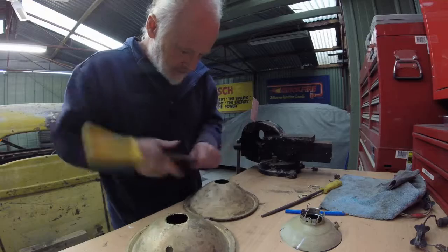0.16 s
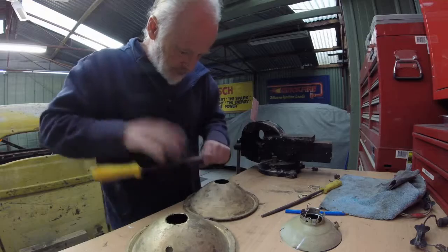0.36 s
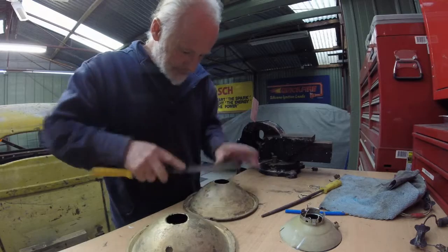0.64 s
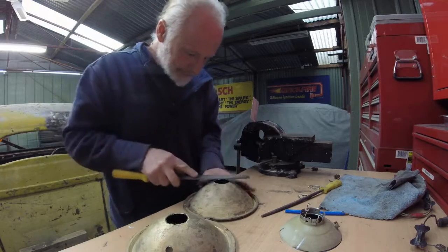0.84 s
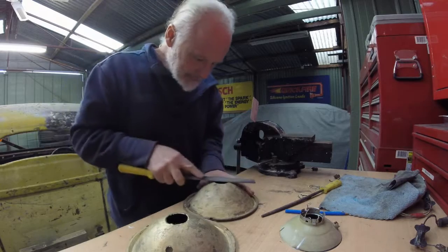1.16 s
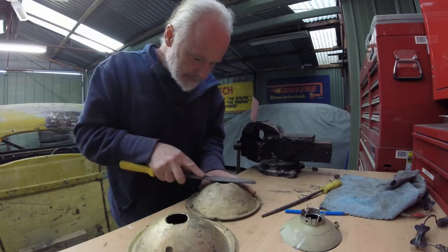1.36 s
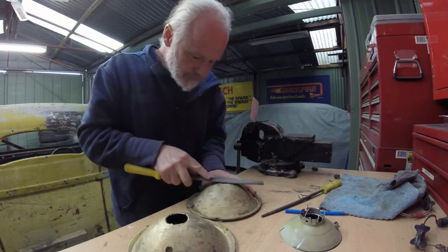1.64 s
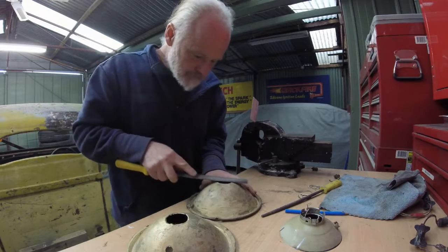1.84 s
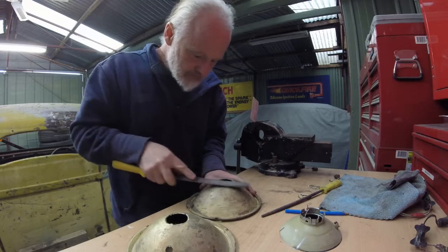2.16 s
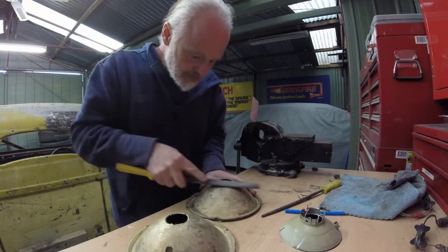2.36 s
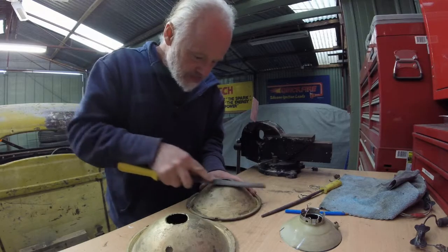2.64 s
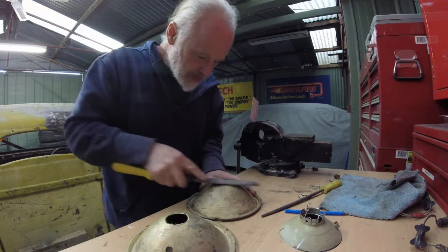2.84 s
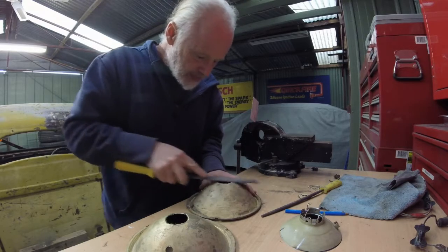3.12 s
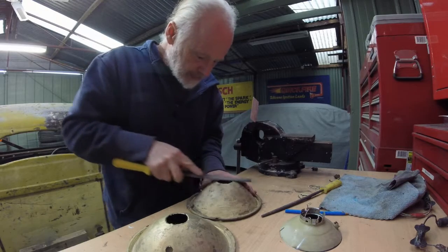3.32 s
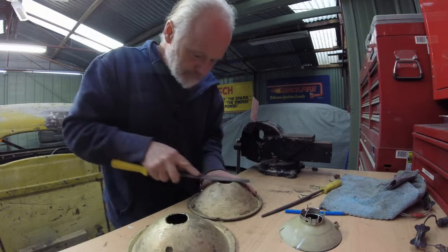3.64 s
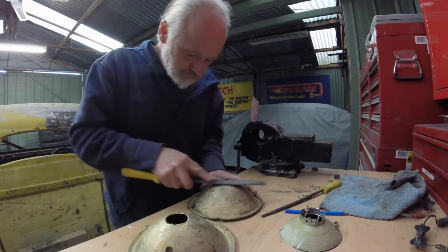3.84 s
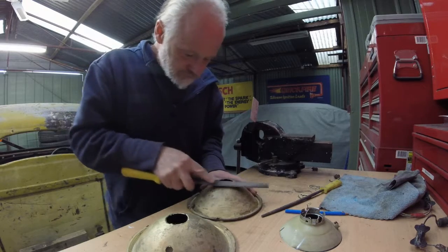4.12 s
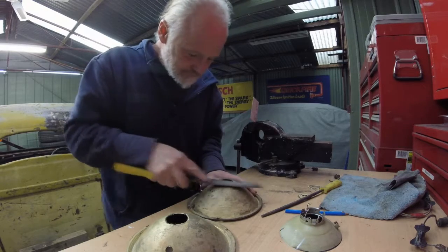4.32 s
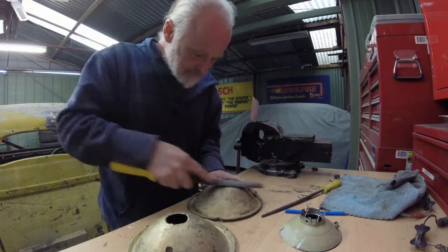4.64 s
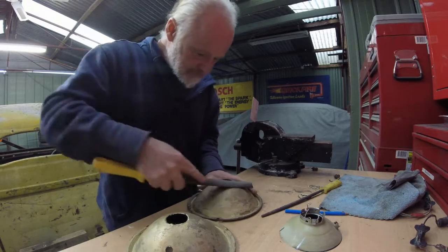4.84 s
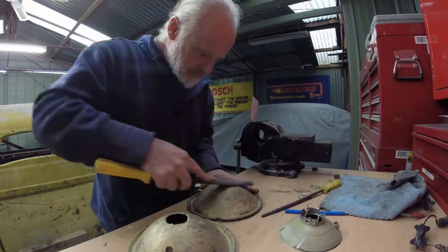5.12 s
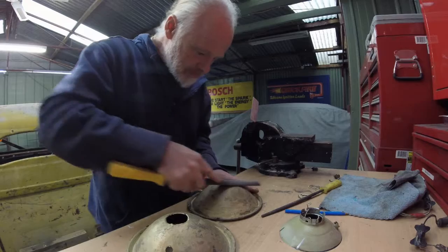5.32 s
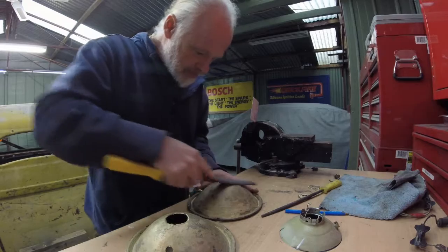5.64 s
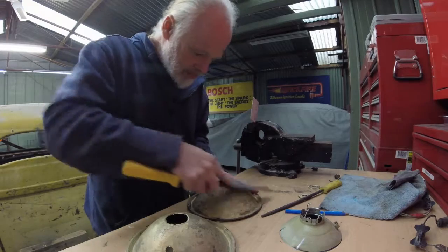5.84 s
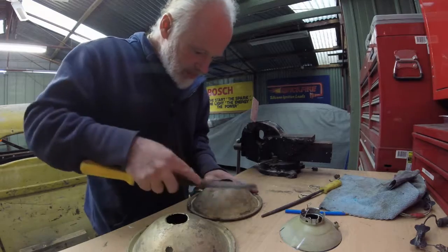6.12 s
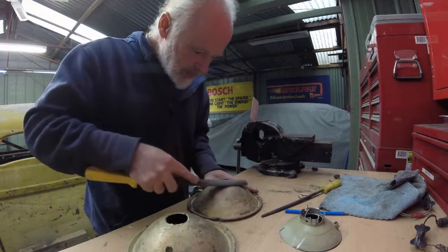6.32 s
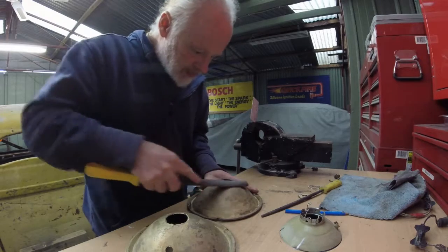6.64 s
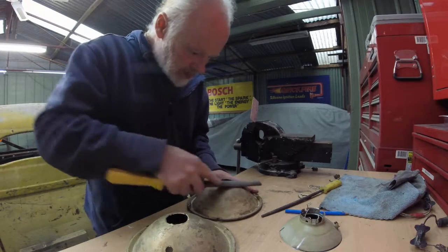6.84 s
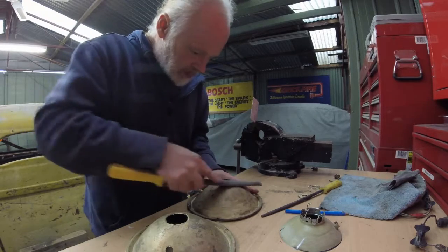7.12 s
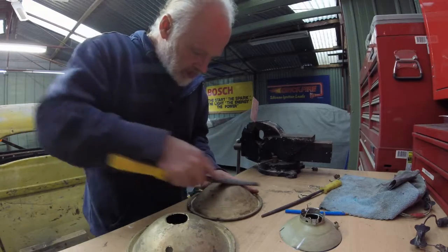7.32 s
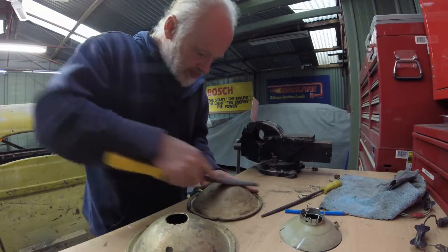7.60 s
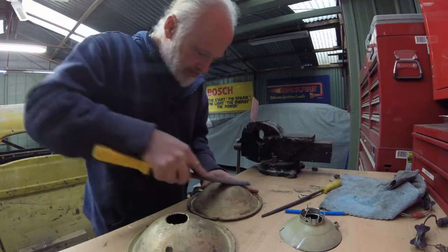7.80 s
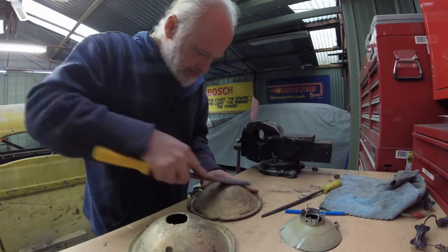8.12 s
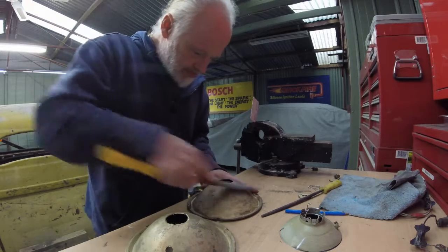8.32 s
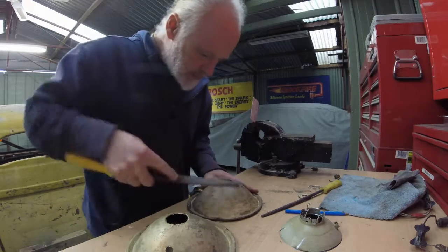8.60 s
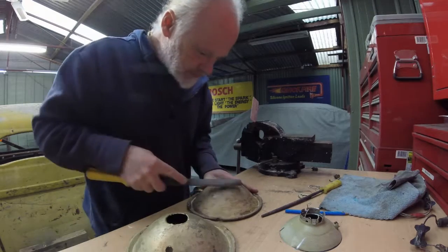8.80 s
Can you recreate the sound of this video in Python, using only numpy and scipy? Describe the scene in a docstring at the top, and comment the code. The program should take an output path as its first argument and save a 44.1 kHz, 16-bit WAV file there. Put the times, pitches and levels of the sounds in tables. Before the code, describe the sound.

A hand file rasps quickly back and forth on a thin metal bowl, with occasional knocks, in a small garage.

```python
"""A hand file works the edge of a thin metal bowl, about seven passes a second, in two runs with a rest.
Its teeth strike a dense train of impulses that excites the bowl's resonances. Stick-slip friction makes
the blade judder and briefly squeal; now and then it catches and rattles the rim on the wooden bench
the bowl is held down on. A small, hard garage reverberates around it, over a low rumble."""
import sys
import numpy as np
from scipy import signal
from scipy.fft import rfft, irfft
from scipy.io import wavfile
from scipy.ndimage import map_coordinates

SR = 44100
rng = np.random.default_rng(int(sys.argv[2]) if len(sys.argv) > 2 else 0)


def inscribe(sig):
    """Save sig as 16-bit PCM at rate SR to the path in sys.argv[1].

    A 1-D sig is mono; a 2-D sig holds one channel per row.
    Samples are clipped to [-1, 1] before scaling.
    """
    pcm = np.round(np.clip(np.atleast_2d(sig).T, -1, 1) * 32767)
    wavfile.write(sys.argv[1], SR, pcm.astype(np.int16))


N = 395136
SECOND_SPOT_S = 4.75  # the file moves to another spot on the edge

# Force spectra of the cutting teeth (rasp, hiss) and the slipping blade (judder).
# Each row: frequency in Hz, relative level in dB.
RASP_SPECTRUM = [(100, -18), (300, 4), (600, -3), (1000, 2.5), (1700, -4), (2200, 0), (2700, -9.5),
                 (3300, -16.5), (3900, -19.5), (6000, -29.5), (16000, -97)]
HISS_SPECTRUM = [(1000, -74.5), (3000, -1.5), (3800, -8.5), (4500, 5), (5500, -2.5), (7000, -1),
                 (8500, -6.5), (10000, -9.5), (12300, -17), (15000, -31)]
JUDDER_SPECTRUM = [(40, -29.5), (85, -9.5), (130, -2), (200, -2.5), (280, 0), (450, -2), (620, -5),
                   (780, -11.5), (1300, -16.5), (2500, -35), (6000, -56)]
def filing(tooth_rate=4200, slip_rate=900, grab_db=2, overlap_s=.005):
    """Impulse excitation: teeth strike faster and harder with speed; slips under load shake the bowl."""
    body, edge = np.zeros((2, N))
    for k, (s, length) in enumerate(passes()):
        direction = (-1) ** k  # 1 is a push, -1 a pull
        rasp_db, hiss_db, judder_db = effort(s + length / 2, direction)
        n = int((length + 2 * overlap_s) * SR)  # the file stays in contact as it turns round
        speed, load = swing(n, crest=.53 - .02 * direction), swing(n, crest=.54)
        stretch = 1 + .012 * rng.standard_normal()  # each pass presses the bowl differently
        ring = 1 + .2 * rng.standard_normal(len(BOWL_MODES))  # each contact point favours other modes
        teeth = ticks(n, tooth_rate * (speed + .3), scatter_db=3) * undb(grab_db * wobble(n, rate=170))
        slips = ticks(n, slip_rate, scatter_db=.7)
        rasp = signal.fftconvolve(teeth * speed ** 1.65, bowl(RASP_SPECTRUM, s, stretch, ring=ring))
        rasp = glide(rasp, n, .025 * direction)  # contact runs up the blade on a push, down on a pull
        judder = signal.fftconvolve(slips * load ** .89, bowl(JUDDER_SPECTRUM, s, stretch))
        add(body, s - overlap_s, undb(rasp_db) * rasp + undb(judder_db + .5) * judder)
        tilt_db = .82 * (hiss_db + 5.5)  # light, hissy passes reach further into the treble
        hiss = signal.fftconvolve(teeth * speed ** 1.79, bowl(HISS_SPECTRUM, s, stretch, tilt_db, ring))
        add(edge, s - overlap_s, undb(rasp_db + hiss_db - 1.5) * glide(hiss, n, .007 * direction))
    return body + steel(edge)


# Bouts of even strokes. Each row: start in seconds, end in seconds, number of passes.
STROKE_BOUTS = [(1.25, 1.513, 1), (1.527, 2.08, 3), (2.08, 2.41, 2), (2.412, 3.582, 8), (3.582, 4.938, 9),
                (4.938, 5.939, 7), (5.939, 6.105, 1), (6.56, 6.757, 1), (6.748, 7.045, 2),
                (7.045, 8.612, 11)]
def passes():
    """Periodic motion: each bout divides into equal passes, given as start and length."""
    return [(s, (end - start) / count) for start, end, count in STROKE_BOUTS
            for s in np.linspace(start, end, count, endpoint=False)]


# How hard the file is worked, heavy at first, then light and hissy.
# Each row: time in seconds, then relative levels in dB of rasp, of hiss over rasp and of judder.
HAND_EFFORT = [(1.41, -28.5, -16, -29), (1.7, -37, -8, -27.5), (1.98, -21, -10, -21.5),
               (2.16, -24, -9.5, -21.5), (2.36, -33, -7.5, -22.5), (2.65, -32, -7.5, -22.5),
               (3.22, -23, -9, -19), (3.97, -24, -8, -21.5), (4.6, -27.5, -9, -19.5),
               (4.95, -35.5, -6, -36), (5.3, -34, -7.5, -27), (5.72, -31, -4.5, -32.5),
               (6.0, -27, -5, -25.5), (6.67, -34.5, -3, -34), (7.2, -32, -6.5, -26),
               (7.6, -32.5, -2.5, -33), (8.27, -33, -4, -29), (8.54, -34, 1, -31)]
def effort(s, direction, push_rasp_db=-1.5, push_judder_db=2):
    """Directional friction: on the first spot a push shakes more and rasps less, a pull the reverse."""
    times, *columns = np.transpose(HAND_EFFORT)
    rasp_db, hiss_db, judder_db = (np.interp(s, times, column) for column in columns)
    lean = direction * (s < SECOND_SPOT_S)
    return rasp_db + lean * push_rasp_db, hiss_db, judder_db + lean * push_judder_db


def swing(n, crest, bite=.78):
    """Half-cycle envelope: zero at both ends, brisker at the start, peaking at the crest (0-1)."""
    turn = np.interp(np.arange(n) / n, [0, crest, 1], [0, .5, 1])
    return np.sin(np.pi * turn) ** np.where(turn < .5, bite, 1)


def ticks(n, rate, scatter_db):
    """Shot noise: random impacts of uneven size at a mean rate a second; rms 1."""
    chance, size, sign = rng.random(n), rng.standard_normal(n), rng.choice([-1, 1], n)
    return unit((chance < rate / SR) * sign * undb(scatter_db * np.clip(size, -2, 2)))


def glide(x, n, share):
    """Time warping: over n samples the pitch sweeps from a share below to a share above."""
    i = np.arange(len(x))
    progress = np.minimum(i / n, 1)
    return map_coordinates(x, [i + share * n * progress * (progress - 1)], order=3)


# Resonances of the bowl. Each row: frequency in Hz with the file on the first spot,
# frequency in Hz on the second spot, width in Hz, nominal lift in dB.
BOWL_MODES = [(155.5, 154.7, 28, 12), (353, 343.5, 72, 6), (538, 522, 97, 6), (690, 650, 31, 4),
              (847, 825, 45, 7), (968, 970, 124, 6), (1137, 1060, 21, 1.5), (1540, 1536, 156, 7.5),
              (1940, 1970, 133, 8.5), (2080, 2147, 156, 6), (2530, 1600, 92, 1.5), (2793, 2896, 143, 9),
              (3340, 3210, 210, 4.5), (4325, 4560, 250, 7.5), (5070, 5280, 370, 8), (5700, 5700, 120, 10),
              (6205, 6420, 350, 12), (6660, 5900, 110, 7), (7500, 11000, 130, -1.5), (7980, 8030, 690, 6.5)]
def bowl(spectrum, s, stretch=1, tilt_db=0, ring=1, size=4096):
    """Source and filter: the impulse response of a force spectrum shaped by the bowl's modes at time s."""
    hz = np.arange(size // 2 + 1) * SR / size
    octaves_up = np.log2(np.maximum(hz / 6000, 1))
    db = slope(spectrum, hz) + tilt_db * octaves_up
    for (first, second, width, lift), share in zip(BOWL_MODES, ring * np.ones(len(BOWL_MODES))):
        centre = stretch * (first if s < SECOND_SPOT_S else second)
        db = db + share * lift / (1 + (2 * (hz - centre) / width) ** 2)
    cepstrum = irfft(db * np.log(10) / 20)
    cepstrum[1:size // 2] *= 2  # folding gives a causal, minimum-phase response
    cepstrum[size // 2 + 1:] = 0
    return unit_energy(irfft(np.exp(rfft(cepstrum))))


def steel(hiss, direct_db=-1, overtone_db=-9, blade_db=-9):
    """Superposition: the hiss radiates straight from the edge and as the ring of the steel."""
    return (undb(direct_db) * hiss + undb(overtone_db) * overtones(hiss)[:N]
            + undb(blade_db) * blade(hiss)[:N])


def overtones(force, count=130, low_hz=4200, high_hz=14500, t60=.072):
    """High modal density: a crowd of short-lived modes of thin steel gives the hiss its zing."""
    t = np.arange(SR // 10) / SR
    place, side = rng.random((2, count))
    hz = low_hz + (high_hz - low_hz) * (np.arange(count) + place) / count
    size = np.sign(side - .5) * np.sqrt(hz)  # higher modes radiate better
    modes = size @ np.sin(2 * np.pi * np.outer(hz, t))
    return signal.fftconvolve(force, unit_energy(modes * undb(-60 * t / t60)))


# Low modes of the blade. Each row: frequency in Hz, relative level in dB, 60 dB decay time in seconds.
BLADE_MODES = [(1896, 8, 0.1), (3628, -7, 0.19), (4130, -9.5, 0.4), (5670, -17, 0.41)]
def blade(force):
    """Modal ringing: the force drives the steel blade, each mode a damped sinusoid."""
    t = np.arange(SR // 2) / SR
    modes = sum(undb(db - 60 * t / t60) * np.sin(2 * np.pi * hz * t) for hz, db, t60 in BLADE_MODES)
    return signal.fftconvolve(force, unit_energy(modes))


# Force spectra of rim on bench and steel on edge. Each row: frequency in Hz, relative level in dB.
THUD_SPECTRUM = [(50, -23), (130, -8.5), (220, -6.5), (340, 0), (480, 0.5), (640, -0.5), (800, -9.5),
                 (1300, -21), (3000, -45), (8000, -72)]
CLASH_SPECTRUM = [(200, -18), (800, 0), (1500, 6), (2100, 3.5), (2800, -6.5), (3650, -4), (4500, -12.5),
                  (6500, -16), (9000, -23), (15000, -42)]
# The file lands or catches.
# Each row: start in seconds, length in seconds, thud level in dB, clash over thud in dB.
FILE_CATCHES = [(1.131, 0.015, -18, -20), (1.362, 0.018, -10.5, -4), (1.393, 0.01, -12.5, -1.5),
                (1.66, .02, -25, -13), (1.85, 0.019, -13, -9), (2.075, 0.014, -15, -11),
                (2.136, 0.032, -19, -6.5), (2.195, 0.019, -14, -7), (2.28, 0.0097, -17, -13.5),
                (2.732, 0.031, -16.5, -13), (2.876, 0.015, -30, -21), (3.024, 0.026, -14, -10),
                (3.23, 0.024, -18.5, 5), (3.375, 0.036, -10.5, -8), (3.694, 0.017, -12.5, -9.5),
                (3.939, 0.013, -17, -9), (3.958, 0.013, -10.5, -5.5), (3.991, 0.013, -14.5, -3),
                (4.217, 0.024, -15, -6), (4.268, .010, -16.5, -5.5), (4.540, 0.012, -21.5, 0),
                (5.308, 0.0083, -20.5, -30), (5.985, 0.014, -19.5, -5.5), (6.026, 0.0062, -19.5, -7),
                (6.526, 0.013, -23, -5.5), (6.968, 0.032, -25.5, -9), (7.136, 0.019, -27.5, -12),
                (8.565, 0.015, -36, -17.5)]
def catches(bounce_rate=1300, clash_rate=2400, rebound_s=.025, rebound_db=-10):
    """Impact chatter: the rim thuds on the bench as steel clashes on the edge, then drops back."""
    out = np.zeros(N)
    for s, length, db, clash_db in FILE_CATCHES:
        n = int(length * SR)
        for delay_s, spectrum, rate, level_db in ((0, THUD_SPECTRUM, bounce_rate, db),
                                                  (0, CLASH_SPECTRUM, clash_rate, db + clash_db),
                                                  (rebound_s, THUD_SPECTRUM, bounce_rate, db + rebound_db)):
            response = bowl(spectrum, s, ring=1.35)  # undamped between bounces, the modes stand out
            burst = signal.fftconvolve(ticks(n, rate, scatter_db=3.5), response)
            add(out, s + delay_s, undb(level_db) * np.sqrt(n) * unit_energy(burst))
    return out


# The blade bites. Each row: start in seconds, length in seconds, centre pitch in Hz, level in dB.
BLADE_SQUEALS = [(1.935, 0.11, 1200, -30), (1.965, 0.06, 1975, -22), (3.185, 0.089, 1157, -30),
                 (3.458, .06, 2825, -35), (3.478, 0.037, 2050, -24), (3.77, .07, 2830, -37),
                 (6.024, 0.066, 4350, -42), (8.506, 0.054, 1993, -35), (8.508, 0.051, 4200, -42),
                 (8.512, 0.055, 2600, -41)]
def squeals(sag=.018, waver=.023, waver_rate=350, flutter_db=-1):
    """Stick-slip oscillation: friction locks briefly on to one resonance in a rough, sagging tone."""
    out = np.zeros(N)
    for s, length, pitch_hz, db in BLADE_SQUEALS:
        n = int(length * SR)
        hz = pitch_hz * (1 + sag * np.linspace(.5, -.5, n)) * (1 + waver * wobble(n, waver_rate))
        tone = np.sin(2 * np.pi * np.cumsum(hz) / SR) * undb(flutter_db * wobble(n, waver_rate))
        add(out, s, undb(db) * unit(tone * swing(n, crest=.5)))
    return out


# The blade leaves the edge, or fingers slide on it or nudge it.
# Each row: start in seconds, length in seconds, ring level in dB, scrape level in dB.
LIGHT_TOUCHES = [(0, 0.145, -52.5, -64), (8.53, 0.046, -45, -49), (8.79, 0.004, -52, -50)]
def touches():
    """Frictional excitation: light contact draws a faint scrape and a thin ring from the lifted file."""
    out = np.zeros(N)
    for s, length, ring_db, scrape_db in LIGHT_TOUCHES:
        force = ticks(int(length * SR), rate=3000, scatter_db=3)
        add(out, s, undb(ring_db) * blade(force))
        add(out, s, undb(scrape_db) * signal.fftconvolve(force, bowl(HISS_SPECTRUM, s)))
    return out


def garage(x, split_hz=2400):
    """Reverberation: early reflections off bench and cabinets colour the treble; the walls ring on."""
    low, high = (signal.butter(2, split_hz, kind, fs=SR, output="sos") for kind in ("low", "high"))
    above_bass = signal.butter(1, 700, "high", fs=SR, output="sos")
    response = (undb(-6.5) * signal.sosfilt(above_bass, tail(t60=.087, delay_s=.001))
                + undb(-9.5) * signal.sosfilt(low, tail(t60=.38, delay_s=.011))
                + undb(-9) * signal.sosfilt(high, tail(t60=.39, delay_s=.01)))
    response[0] += 1  # direct sound
    return signal.fftconvolve(x, unit_energy(response))[:N]


def tail(t60, delay_s):
    """Diffuse field: dense echoes set in after a delay and decay exponentially."""
    t = np.arange(SR) / SR
    return unit_energy(rng.standard_normal(SR) * 1000 ** (-t / t60) * (t > delay_s))


# Still air of the garage. Each row: frequency in Hz, relative spectral density in dB.
AIR_SPECTRUM = [(12, -22), (20, -4), (49, -7.5), (57, -7), (70, -13), (103, -7.5), (147, -18), (223, -16),
                (497, -24), (656, -24), (796, -29.5), (1730, -32), (2550, -41), (12000, -61), (15000, -70)]
# Bench and floor rumble more once the work starts. Each row: time in seconds, gain in dB.
RUMBLE_SWELL = [(0, 0), (.7, -2.5), (1.1, 0.5), (2, 2.5), (5, 4), (6.4, 3.5), (8.3, 5), (8.7, 5.5)]
def air(level_db=-42.5, band_hz=1950, band_width_hz=450, band_db=4.5, rumble_hz=2400, sub_hz=24):
    """Ambient noise: a low rumble swells a little under a faint, even hiss with one soft middle band."""
    hz = np.arange(N // 2 + 1) * SR / N
    db = slope(AIR_SPECTRUM, hz) + band_db * np.exp(-((hz - band_hz) / band_width_hz) ** 2)
    spectrum = rfft(rng.standard_normal(N)) * undb(db) * hz / np.hypot(hz, sub_hz)
    noise = irfft(spectrum, N)
    low = irfft(spectrum / (1 + (hz / rumble_hz) ** 4), N)
    swell_db = np.interp(np.arange(N) / SR, *np.transpose(RUMBLE_SWELL)) + .5 * wobble(N, rate=6.6)
    return undb(level_db) * (noise - low + low * undb(swell_db)) / np.std(noise)


def wobble(n, rate):
    """Random modulation: a line through Gaussian values drawn rate times a second."""
    knots = rng.standard_normal(512)
    return np.interp(np.arange(n) * rate / SR, np.arange(len(knots)), knots)


def slope(points, hz):
    """Spectral envelope: (Hz, dB) points interpolated on a log-frequency axis."""
    point_hz, db = np.transpose(points)
    return np.interp(np.log(hz + 1), np.log(point_hz), db)


def undb(db):
    """Decibels to amplitude ratio."""
    return 10 ** (np.asarray(db) / 20)


def unit(x):
    """Normalisation to rms 1."""
    return x / np.sqrt(np.mean(x ** 2) + 1e-18)


def unit_energy(x):
    """Normalisation to a sum of squares of 1."""
    return x / np.sqrt(np.sum(x ** 2) + 1e-18)


def add(track, s, x):
    """Superposition of x on the track from time s."""
    i = max(int(s * SR), 0)
    track[i:i + len(x)] += x[:N - i]


def scene():
    """Linear mixing: file and bowl sound through the room, over its ambient noise, in mono."""
    return (garage(filing() + catches() + squeals() + touches()) + air())[None]


def record(dry, top_hz=14700):
    """Clipping and band limiting: peaks stop at full scale, then a steep low-pass cuts the top."""
    lowpass = signal.ellip(8, .2, 80, top_hz, fs=SR, output="sos")
    return signal.sosfilt(lowpass, np.clip(dry, -1, 1))


dry = scene()
out = record(dry)
inscribe(out)
```